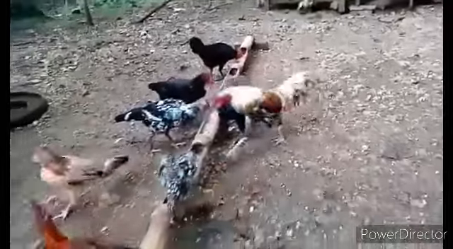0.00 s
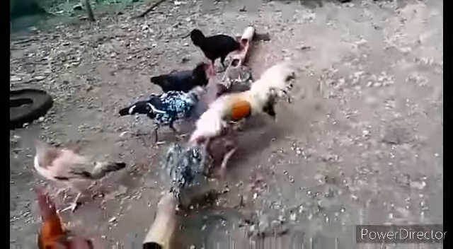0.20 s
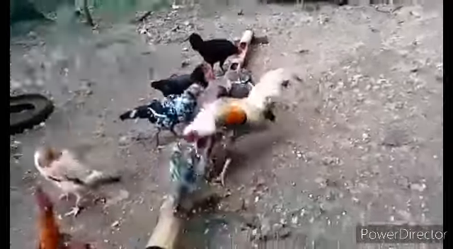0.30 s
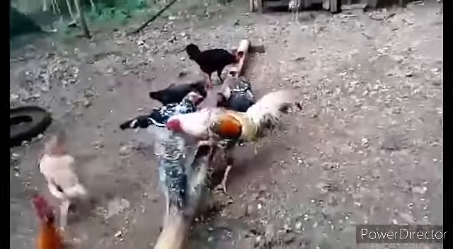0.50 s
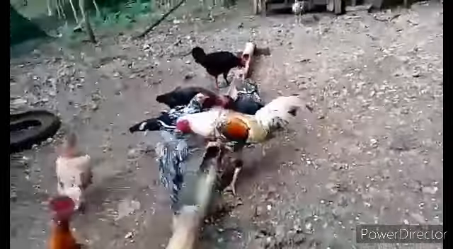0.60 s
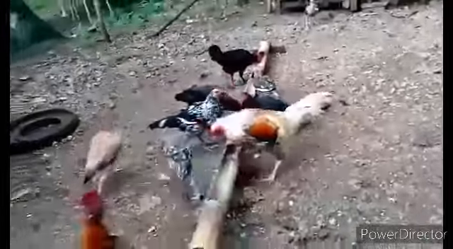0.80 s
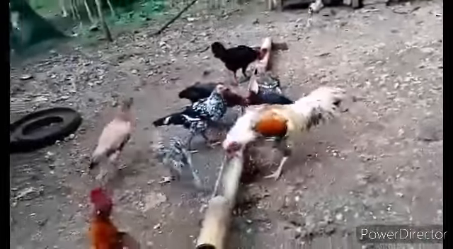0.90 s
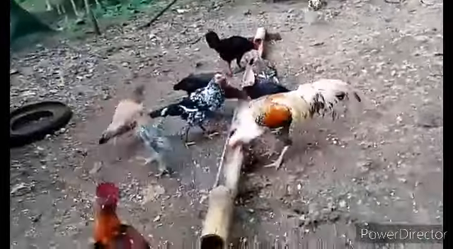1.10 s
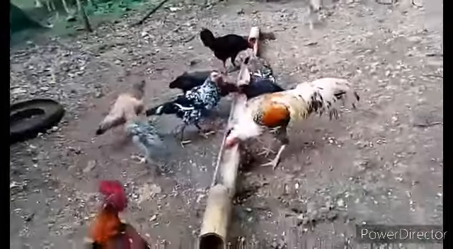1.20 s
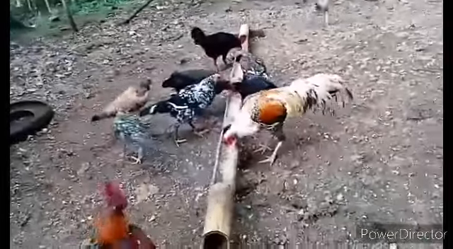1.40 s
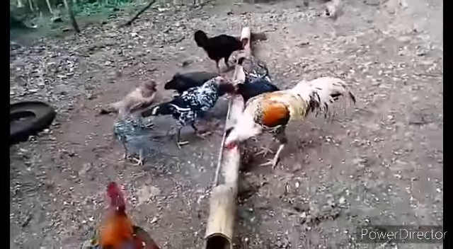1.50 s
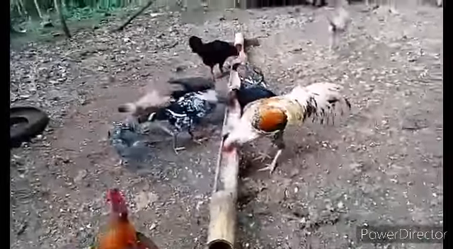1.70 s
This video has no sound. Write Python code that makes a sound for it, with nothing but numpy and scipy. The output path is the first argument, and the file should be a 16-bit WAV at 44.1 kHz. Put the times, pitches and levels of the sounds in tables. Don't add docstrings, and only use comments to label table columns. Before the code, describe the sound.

Beaks knock and tick on hollow wood as hens squawk shortly in a gritty outdoor yard

```python
import sys
import numpy as np
from scipy import signal
from scipy.fft import rfft, irfft
from scipy.io import wavfile
from scipy.ndimage import uniform_filter1d

SR = 44100
rng = np.random.default_rng(int(sys.argv[2]) if len(sys.argv) > 2 else 0)


def boost_factor(decibels):
    exponent = np.asarray(decibels, float) / 20
    return 10 ** exponent


def persist_wave(psi):
    counts = np.round(np.clip(psi, -1, 1) * 32767).astype(np.int16)
    wavfile.write(sys.argv[1], SR, np.atleast_2d(counts).T)


N = 79380


def evened(x):
    return x / np.sqrt(np.mean(x ** 2) + 1e-20)


def read(points, hz):
    f, value = np.transpose(points)
    return np.interp(np.log(hz + 1), np.log(f + 1), value)


def add(mix, start_s, sound):
    part = mix[max(round(start_s * SR), 0):][:len(sound)]
    part += sound[:len(part)]


def colour(x, points):
    n = x.shape[-1]
    return irfft(rfft(x) * boost_factor(read(points, np.fft.rfftfreq(n, 1 / SR))), n)


def resonate(x, hz, width_hz):
    turn = np.exp(2j * np.pi * np.cumsum(hz * np.ones(len(x))) / SR)
    r = np.exp(-np.pi * width_hz / SR)
    return 2 * (turn * signal.lfilter([1 - r], [1, -r], x / turn)).real


def resonate_twice(x, hz, width_hz):
    return resonate(resonate(x, hz, width_hz), hz, width_hz)


def wander(n, size):
    return evened(uniform_filter1d(uniform_filter1d(rng.standard_normal(n), size), size))


def bands(rows, flutter_db, drift):
    out = 0
    for centre_hz, width_hz, db in rows:
        hz = centre_hz * (1 + drift * wander(N, size=4000))
        level = boost_factor(db + flutter_db * wander(N, size=2000))
        out = out + level * evened(resonate_twice(rng.standard_normal(N), hz, width_hz))
    return out


# (time [s], grit level [dB], soft rustle level [dB])
FEET = [(0, -64, -75.5), (0.046, -67.5, -69), (.07, -66.5, -90), (.155, -69.5, -94), (.17, -57.5, -76),
        (.3, -64, -62.5), (.5, -58, -77), (.7, -64.5, -74.5), (0.776, -68.5, -81), (.83, -69.5, -68),
        (.95, -70.5, -66.5), (1.0, -66, -61.5), (1.08, -69.5, -75.5), (1.26, -65.5, -67.5),
        (1.479, -73, -79), (1.55, -84, -87), (1.66, -64, -70.5), (1.8, -66, -60.5)]
# (frequency [Hz], gain [dB])
GRIT_SHADE = [(300, -7), (620, -8), (1000, 2.5), (1600, -4.5), (2500, 0), (4500, -9), (7500, -16.5)]
RUSTLE_SHADE = [(150, -5), (300, 2.5), (450, -5.5), (650, 2), (1000, 0), (1500, -5), (2500, -32.5)]


def shuffle():
    grains_per_s, spread_db = 3000, 3
    s, *levels = np.transpose(FEET)
    out = 0
    for db, shade in zip(levels, (GRIT_SHADE, RUSTLE_SHADE)):
        hits = rng.random(N) < grains_per_s / SR
        sizes = boost_factor(spread_db * np.minimum(rng.exponential(1, N), 5))
        grains = hits * sizes * rng.choice([-1, 1], N)
        x = evened(colour(grains + 0.21 * rng.standard_normal(N), shade))
        out = out + x * boost_factor(np.interp(np.arange(N) / SR, s, db) + 2 * wander(N, size=400))
    return out


# (frequency [Hz], gain [dB])
AIR_SHADE = [(20, -70), (40, -45), (141, -4), (568, -35.5), (2110, -24), (5680, -37.5), (7230, -55.5),
             (11100, -25), (11800, -34), (12300, -75)]
AIR_DB = -69
# (frequency [Hz], width [Hz], level [dB])
INSECTS = [(5550, 1200, -74), (8010, 2300, -78.5), (11300, 1600, -76)]
MOTOR = [(72.6, 95, -73), (123.2, 33, -65), (150.8, 17, -65.5), (183.2, 27, -67)]
# (time [s], level [dB])
RUMBLE_GUSTS = [(0, 0), (0.091, 5.5), (.134, -11), (.244, 4), (.344, 2), (.486, -3.5), (.556, 4),
                (0.617, -13), (.676, 3), (.776, -13.5), (.816, -0.5), (.946, -3), (.976, -9), (1.132, 3.5),
                (1.2, -0.5), (1.5, -4.5), (1.658, -3.5), (1.8, 0)]
# (frequency [Hz], likeness [0-1])
LIKENESS = [(60, .7), (150, .88), (400, .5), (1000, .8), (3000, .45), (8000, .1)]


def still_air():
    gust = boost_factor(np.interp(np.arange(N) / SR, *np.transpose(RUMBLE_GUSTS)))
    air = boost_factor(AIR_DB) * evened(colour(rng.standard_normal(N), AIR_SHADE))
    insects = bands(INSECTS, flutter_db=0.75, drift=0.023)
    return air + insects + gust * bands(MOTOR, flutter_db=3.3, drift=.09)


def background():
    shared, other = still_air(), still_air()
    grit = shuffle()
    right = shared + grit
    same = np.clip(read(LIKENESS, np.fft.rfftfreq(N, 1 / SR)), 0, 1)
    left = same * rfft(right) + np.sqrt(1 - same ** 2) * rfft(other + yard(grit)[1])
    return np.array([irfft(left, N), right])


def patchy(x):
    drift_db = 2.2
    z = signal.stft(x, nperseg=512)[2]
    patches = uniform_filter1d(rng.standard_normal(z.shape[1:]), size=6, axis=0)
    patches = evened(uniform_filter1d(patches, size=12, axis=1))
    above_rumble = (np.arange(len(patches)) > 3)[:, None]
    return signal.istft(z * boost_factor(drift_db * patches * above_rumble), nperseg=512)[1][:, :N]


# (time [s], peak level [dB], ring [Hz], tick level [dB], contact length [s])
PECKS = [(0.008, -29.5, 1125, -1, 0.0042), (0.018, -39.5, 1900, -49, 0.0025),
         (0.164, -46, 2880, -2.5, 0.0036), (0.2098, -22.5, 2100, -12.5, 0.0045),
         (0.255, -35, 900, -45, 0.0018), (0.258, -52, 1010, -40, 0.0055),
         (0.285, -46, 850, -30, 0.0018), (0.496, -44, 980, -23, 0.0073),
         (0.526, -48, 3000, -1.5, 0.0096), (0.562, -43, 2760, -9, 0.0076),
         (0.572, -48, 2680, 5.5, 0.0059), (0.802, -45, 1020, -34, 0.0095),
         (1.066, -42.5, 1030, -17, 0.004), (1.108, -46.5, 2420, -20, 0.0054),
               (1.127, -35, 1010, -20, 0.0058), (1.242, -41.5, 860, -30, 0.0071),
               (1.342, -55.5, 965, -24, 0.0026), (1.368, -50, 1100, -16, 0.0029),
               (1.377, -38, 990, -13, 0.0073), (1.445, -48, 810, -32, 0.0076),
               (1.609, -56.5, 2110, -20, 0.0051), (1.681, -40, 790, -23, 0.0068),
               (1.691, -37, 930, -26, 0.006), (1.718, -40, 1300, -24, 0.001)]
# (frequency [Hz], level [dB])
TROUGH_MODES = [(780, -60), (1030, -2), (1480, 8.5), (2040, 5.5), (2760, -5.5), (3450, -0.5), (3750, -4),
                (4250, -8), (5450, -10)]


def peck(s, db, ring_hz, tick_db, length_s):
    ring_t60_s, away_db_per_oct = .0105, -5
    scrape, scrape_s, hard_s = .06, .012, .0055
    tick_hz, tick_width_hz = 4300, 3600
    n = 2400
    t = np.arange(n) / SR
    u = t / max(length_s, .001)
    blow_noise, tick_noise, rattle = rng.standard_normal((3, n))

    drag = scrape * np.clip(length_s / hard_s - 1, 0, 1) * np.minimum(u, 1) * np.exp(-t / scrape_s)
    rattle_gain = boost_factor(18.8 * uniform_filter1d(rattle, size=9))
    blow = blow_noise * rattle_gain * (u ** 2 * np.exp(-5 * u) + drag)

    modes = 0
    for hz, mode_db in TROUGH_MODES + [(ring_hz, 0)]:
        level = boost_factor(mode_db + away_db_per_oct * abs(np.log2(hz / ring_hz)))
        decay = boost_factor(-60 * t / ring_t60_s * np.sqrt(hz / ring_hz))
        modes = modes + level * np.sin(2 * np.pi * hz * t) * decay
    body = signal.fftconvolve(blow, modes)[:n]
    band = signal.butter(3, [620, 2 * ring_hz + 1700], "band", fs=SR, output="sos")
    body = signal.sosfilt(band, body)

    tick = tick_noise * u ** 2 * np.exp(-6 * u)
    for _ in range(3):
        tick = resonate(tick, tick_hz, tick_width_hz)
    knock = body / abs(body).max() + boost_factor(tick_db + 1.5) * tick / abs(tick).max()
    return s + 0.000975, boost_factor(db) * knock


# (time [s], length [s], level [dB], pitch [Hz])
CHIRPS = [
    (0.081, 0.014, -50.5, 1562),
    (0.114, 0.052, -83, 1568),
    (.122, 0.025, -64, 1550),
    (.984, 0.014, -61, 1535),
    (1.579, 0.019, -64.5, 1022),
]


def peep(s, length_s, db, hz):
    t = np.arange(0, length_s, 1 / SR)
    glide = 1.02 - .04 * t / length_s + .015 * wander(len(t), size=100)
    turns = np.cumsum(hz * glide) / SR
    return s, boost_factor(db) * np.sin(np.pi * t / length_s) ** .5 * np.sin(2 * np.pi * turns)


# (time [s], level [dB], pitch [Hz], roughness [0-1], odd overtones [dB])
HEN_CALLS = [
    [(.305, -51.5, 488.2, 0.3, 12), (.317, -36.5, 537.5, 0.1, -22), (.335, -30.5, 602.6, 0.11, -0.5),
     (.357, -25.5, 621.8, 0.02, -5.5), (.369, -23.5, 618.5, 0.04, 18), (.379, -28.5, 630.2, 0.2, -13),
     (.389, -23.5, 626.7, 0.16, 7), (.42, -35, 570.4, 0.37, 1), (.446, -48.5, 510, 0.3, -5)],
    [(.583, -55, 439, 0, -18), (.597, -35, 540.2, 0.1, -28), (.61, -34, 587, 0.3, -2),
     (.62, -29.5, 603, 0.39, -6), (.629, -35.5, 619, 0.2, 15.5), (.637, -40.5, 622.3, 0, 8),
     (.648, -38.5, 636.6, 0, 15), (.664, -43, 515, 0.2, -12), (.67, -46, 487, 0.3, -9)],
]
# (frequency [Hz], gain [dB])
HEN_THROATS = [
    [(600, -11), (1230, 14), (1850, 3), (2350, -4), (3110, 0.5), (3750, -8), (5000, -18), (9000, -36)],
    [(600, -8.5), (1200, 18.5), (1800, -9), (2350, 9), (3100, -7.5), (3750, -9), (5000, -27), (9000, -53)],
]
HALF_BEATS = [.1, .45]
# (frequency [Hz], width [Hz], level [dB])
RASP_BANDS = [(1336, 400, 7), (1852, 500, 6), (2222, 740, 0), (3000, 190, -14), (4860, 1400, -20),
              (7900, 1100, -28)]


def squawk(rows, throat, half):
    jitter, shimmer_db = .03, 1.4
    dull_per_db, dull_hz = .5, 2330
    s, *columns = np.transpose(rows)
    t = np.arange(s[0], s[0] + .2, 1 / SR)
    n = len(t)
    db, hz, rough, odd_db = (np.interp(t, s, c) for c in columns)
    rough = np.clip(rough, .02, .11)
    turns = np.cumsum(hz * (1 + jitter * rough * wander(n, size=60))) / SR
    dim_db = dull_per_db * (db - db.max())

    tone, power = 0, 0
    for k in range(1, 16):
        throat_db = read(throat, k * hz) + k % 2 * odd_db
        effort_db = dim_db * np.clip(k * hz / dull_hz - 1, 0, 1)
        level = boost_factor(throat_db + effort_db + shimmer_db * wander(n, size=250))
        tone = tone + level * np.cos(2 * np.pi * (k * turns + rng.random()))
        power = power + boost_factor(throat_db) ** 2
    tone = tone / np.sqrt(power)
    tone *= (1 + half * np.cos(np.pi * turns)) * boost_factor(shimmer_db * wander(n, size=90))

    puffs = (0.48 + np.exp(-(turns % 1) / 0.23)) * rng.standard_normal(n)
    rasp = 0
    for centre_hz, width_hz, rasp_db in RASP_BANDS:
        moved_hz = centre_hz * (hz / 620) ** .5
        rasp = rasp + boost_factor(rasp_db) * resonate_twice(puffs, moved_hz, width_hz)

    ends = np.clip((s[-1] - t) / 0.0018, 0, 1) * np.clip((t - s[0]) / 0.0013, 0, 1)
    voice = np.sqrt(1 - rough) * tone + np.sqrt(rough) * evened(rasp)
    return s[0], ends * boost_factor(db) * voice


# (time [s], peak level [dB], frequency [Hz], t60 [s])
BUMPS = [
    (0.496, -47.5, 250, 0.11),
    (0.821, -41.5, 307, 0.1),
    (1.113, -40, 300, 0.088),
    (1.139, -58, 342, 0.081),
    (1.264, -52, 272, 0.051),
]


def thud(s, db, hz, t60_s):
    t = np.arange(4000) / SR
    x = resonate(rng.standard_normal(4000), hz, 260) * np.minimum(t / .004, 1) * boost_factor(-60 * t / t60_s)
    x = signal.sosfilt(signal.butter(2, [150, 700], "band", fs=SR, output="sos"), x)
    return s - .003, boost_factor(db) * x / abs(x).max()


def yard(x):
    t60_s, dull_hz = .14, 4500
    t = np.arange(SR // 3) / SR
    shape = (2, len(t))
    echoes = rng.standard_normal(shape) * (rng.random(shape) < .2) * boost_factor(-60 * t / t60_s) * (t > .004)
    echoes = signal.lfilter(*signal.butter(1, dull_hz, fs=SR), echoes)
    return signal.fftconvolve(x[None], echoes / np.linalg.norm(echoes[0]), axes=1)[:, :N]


# (frequency [Hz], left minus right [dB])
PORT_TILT = [(60, -8.5), (190, -4.5), (350, -12.5), (620, -7), (1200, -5.5), (2000, -14), (3600, -14.5),
             (8000, 5), (11500, -7)]


def ports(left, right):
    lead_samples = 47
    half = boost_factor(read(PORT_TILT, np.fft.rfftfreq(N, 1 / SR)) / 2)
    return irfft(np.array([rfft(np.roll(left, -lead_samples)) * half, rfft(right) / half]), N)


def scene():
    peck_yard_db, hen_yard_db = -21, -15
    taps, hen = np.zeros((2, N))
    for make, rows in ((peck, PECKS), (peep, CHIRPS), (thud, BUMPS)):
        for row in rows:
            add(taps, *make(*row))
    for call in zip(HEN_CALLS, HEN_THROATS, HALF_BEATS):
        add(hen, *squawk(*call))
    wet = yard(boost_factor(peck_yard_db) * taps + boost_factor(hen_yard_db) * hen)
    return ports(*(taps + hen + wet + patchy(background())))


def gate(x):
    over_db, cut_db, low_hz, high_hz = 3.2, -30, 5800, 11500
    hz, _, z = signal.stft(x, SR, nperseg=1024)
    power = uniform_filter1d((abs(z) ** 2).mean(0), size=9, axis=0)
    power = uniform_filter1d(power, size=4, axis=1)
    db = 10 * np.log10(power + 1e-20)
    band = (hz > low_hz) & (hz < high_hz)
    shut = band[:, None] & (db < np.percentile(db[band], 10) + over_db)
    return signal.istft(z * np.where(shut, boost_factor(cut_db), 1), nperseg=1024)[1][:, :N]


def top_cut(x):
    return signal.sosfilt(signal.butter(12, 12180, fs=SR, output="sos"), x)


# (frequency [Hz], gain [dB])
MIC_CURVE = [(30, -17), (60, -6), (6300, 0), (7000, -10), (7600, 0), (9600, 0), (10200, -12), (11000, 0),
             (12400, -12)]


def record(dry):
    mix = gate(colour(dry, MIC_CURVE))
    return top_cut(mix)


dry = scene()
out = record(dry)
persist_wave(out)
```